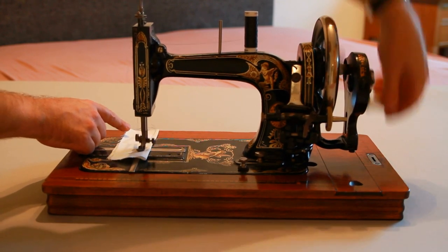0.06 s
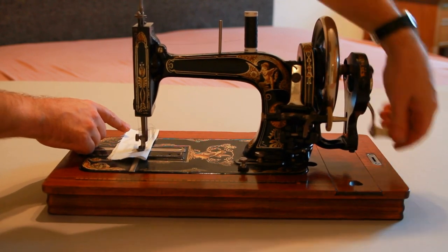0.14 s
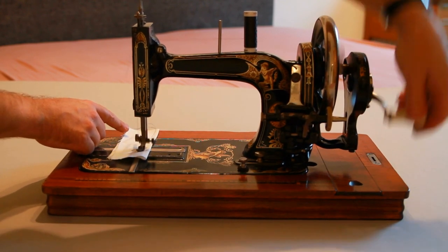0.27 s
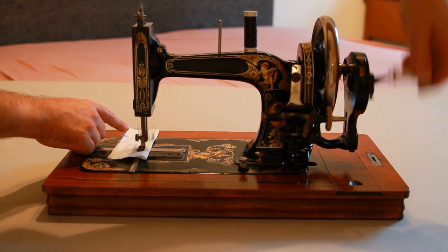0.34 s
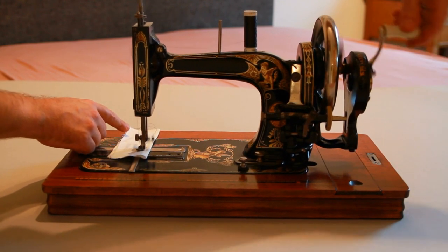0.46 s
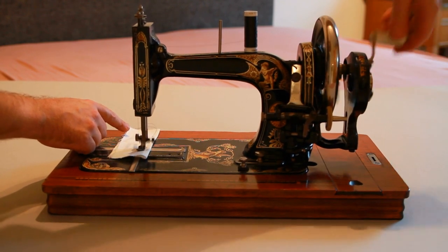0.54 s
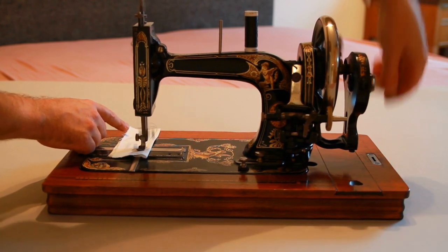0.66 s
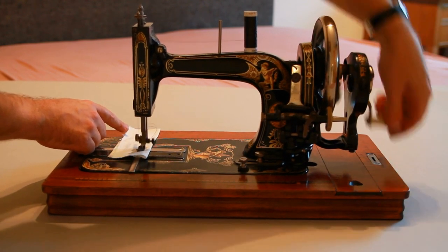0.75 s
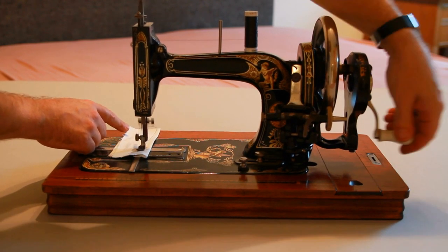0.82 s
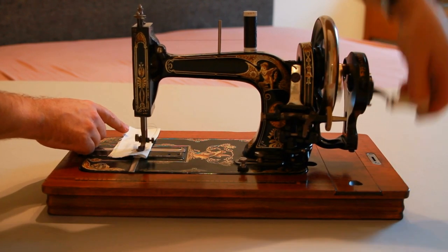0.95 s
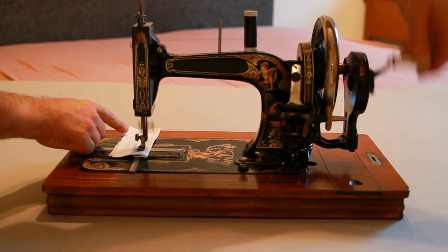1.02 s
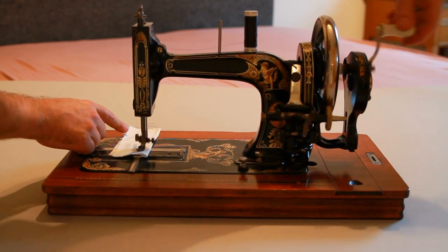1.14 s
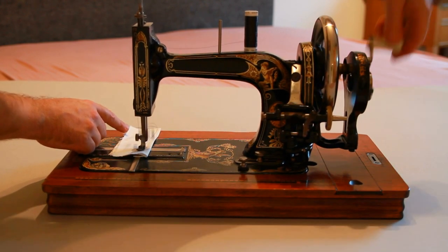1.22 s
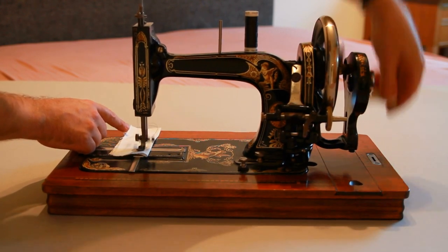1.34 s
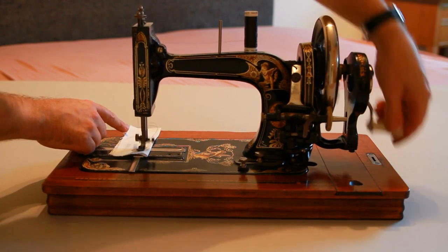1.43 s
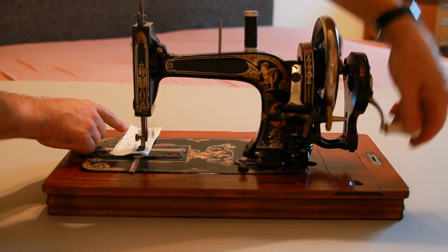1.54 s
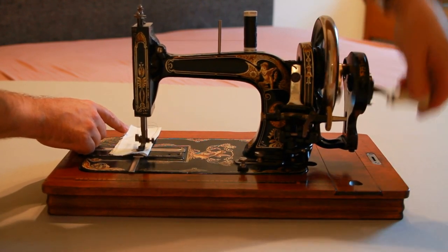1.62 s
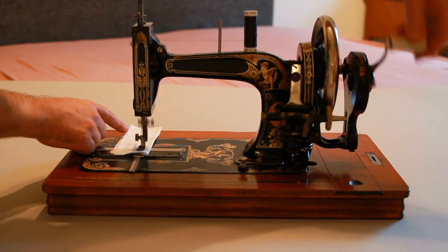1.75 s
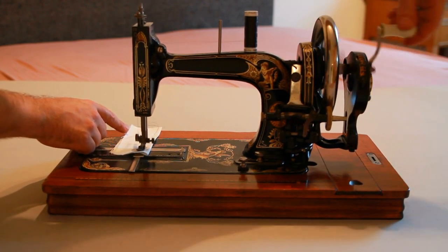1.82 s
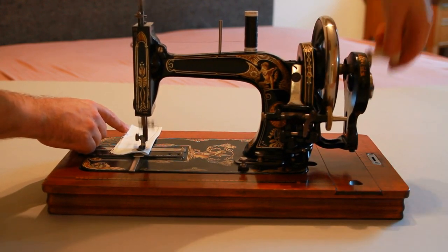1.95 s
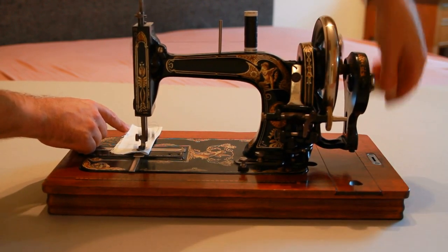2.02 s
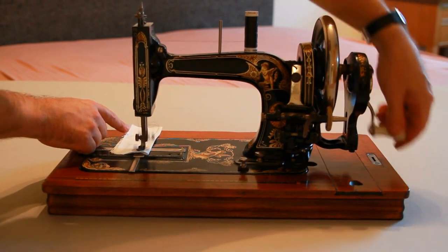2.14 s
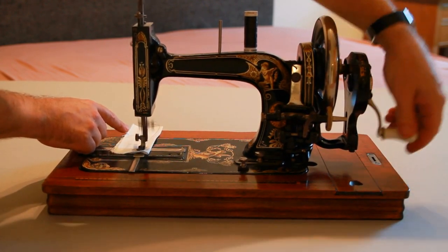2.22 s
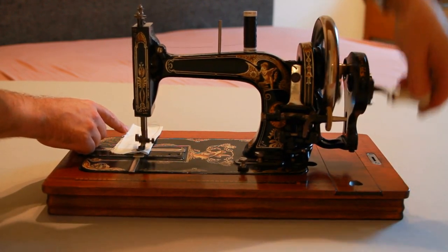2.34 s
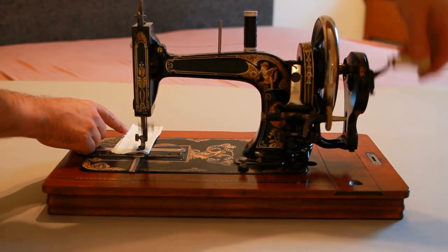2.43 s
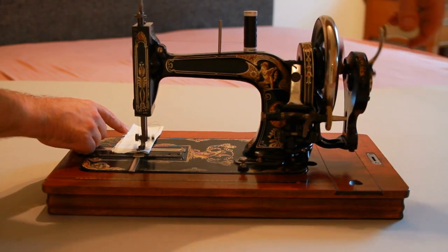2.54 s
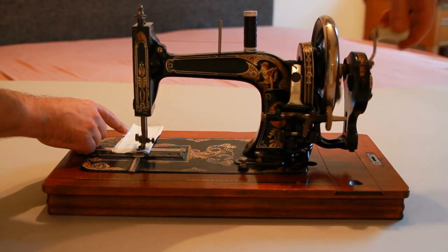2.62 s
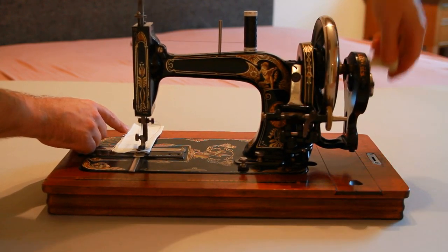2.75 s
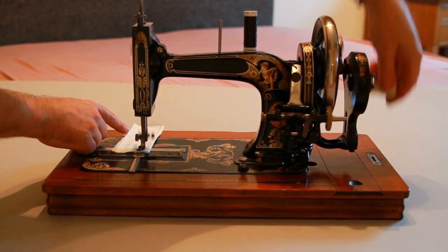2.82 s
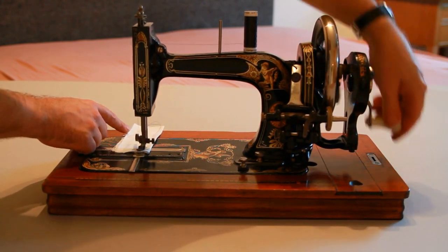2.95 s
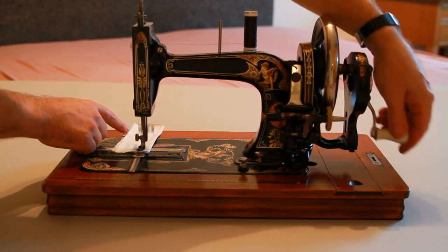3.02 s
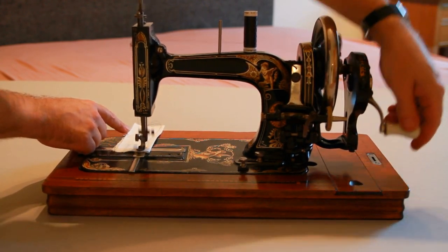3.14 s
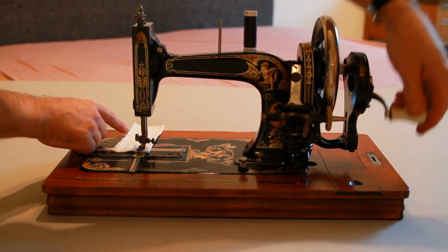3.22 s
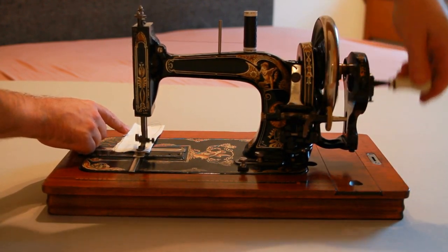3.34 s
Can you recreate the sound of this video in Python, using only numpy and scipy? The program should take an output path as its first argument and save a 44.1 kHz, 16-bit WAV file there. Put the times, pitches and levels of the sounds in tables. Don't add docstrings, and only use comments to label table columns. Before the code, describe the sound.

An old sewing machine's sharp metallic clacking, about four or five stitches a second, gradually slowing.

```python
import sys
import numpy as np
from scipy import signal
from scipy.fft import rfft, irfft
from scipy.io import wavfile
from scipy.ndimage import uniform_filter1d

SR = 44100
rng = np.random.default_rng(int(sys.argv[2]) if len(sys.argv) > 2 else 0)


def int16_out(signal):
    q = np.round(np.clip(np.atleast_2d(signal).T, -1, 1) * 32767)
    wavfile.write(sys.argv[1], SR, q.astype(np.int16))


def boost(x):
    u = np.asarray(x, float) / 20
    return 10 ** u


N = 147735

# start in seconds, peak in dB.
FEED_LIFTS = [(0.0595, -34), (0.2649, -29), (0.477, -35), (0.6958, -33), (0.9125, -32.5), (1.1334, -39),
              (1.3555, -35), (1.585, -35), (1.822, -29.5), (2.0592, -44), (2.2978, -38.5), (2.5745, -44),
              (2.8833, -45), (3.235, -41)]
# start in seconds, peak in dB.
FEED_PUSHES = [(0.0867, -21.5), (0.2907, -21.5), (0.5077, -22.5), (0.7212, -25), (0.94, -20), (1.1591, -26),
               (1.3833, -24.5), (1.612, -19), (1.8511, -21.5), (2.0822, -25), (2.3216, -21),
               (2.5945, -26.5), (2.8977, -28), (3.2514, -34)]
# start in seconds, peak in dB.
SHUTTLE_CLACKS = [(0.1141, -6), (0.3185, -3), (0.5347, -5.5), (0.7523, -4), (0.9683, -7), (1.1888, -16),
                  (1.4134, -1), (1.644, -15), (1.8797, -2.5), (2.1132, -7.5), (2.3583, -8), (2.636, -23),
                  (2.9457, -20.5), (3.3113, -27)]
# start in seconds, peak in dB.
SHUTTLE_RATTLES = [(.1400, -13.5), (.3445, -16.5), (.5632, -13), (.7790, -12), (.9971, -10), (1.2175, -16),
                   (1.4571, -18.5), (1.6725, -11), (1.9111, -14), (2.144, -13.5), (2.391, -11.5),
                   (2.6718, -11.5), (2.9908, -23), (3.3444, -26.5)]
# start in seconds, peak in dB.
TAKEUP_SLAPS = [(0.1523, 1), (0.3567, 0.5), (0.5755, 0.5), (0.791, -0.5), (1.0091, 0), (1.2302, 0.5),
                (1.6839, 1.5), (1.9232, 0), (2.1564, 1), (2.4041, 1), (2.6855, -2.5), (3.0028, -7)]
# start in seconds, peak in dB.
SPRING_TICKS = [(.2838, -29), (.4998, -32), (.7153, -35), (.9318, -34), (1.154, -40), (1.384, -29),
                (1.611, -27.5), (1.8432, -29), (2.0736, -40), (2.3151, -37), (2.593, -31), (2.8827, -47),
                (2.8963, -34), (3.2331, -45), (3.252, -42)]
# start in seconds, peak in dB.
STRAY_CLICKS = [(.13, -9), (.3127, -18), (.3787, -25), (.5546, -19), (.773, -22), (.9908, -15),
                (1.238, -13), (1.2548, -10.5), (1.6556, -14), (1.8992, -10), (1.9031, -7.5), (1.916, -9),
                (1.9354, -6.5), (1.9477, -12.5), (2.3674, -18), (2.382, -4.5), (2.4357, -21), (2.7995, -41),
                (2.9383, -28), (2.9594, -20), (2.9776, -23), (2.986, -16), (3.0086, -5.5), (3.0185, -18),
                (3.029, -6), (3.037, -8), (3.261, -32), (3.299, -37), (3.33, -29)]
# start in seconds, peak in dB.
CRANK_TICKS = [
    (2.786, -33),
    (2.848, -47),
    (2.8823, -33),
    (3.118, -37),
    (3.2345, -31),
]

# frequency in Hz, density in dB per Hz.
FEED_SPECTRUM = [(530, -11), (1300, 4), (2660, -19.5), (5190, 7.5), (7040, -13), (9900, -25),
                 (11600, -17.5), (15200, -31), (16500, -33)]
CLACK_SPECTRUM = [(530, -34), (900, -27.5), (2410, -24), (3270, -15.5), (3920, -6.5), (5650, -5.5),
                  (8980, -2.5), (15200, -3), (16500, -10.5)]
RATTLE_SPECTRUM = [(530, -20), (900, -8), (3780, 0.5), (6080, -5.5), (7040, 6), (7660, -6), (13100, 1.5),
                   (15500, -7), (16500, -3)]
SLAP_SPECTRUM = [(600, -30), (1500, -13.5), (3000, -8), (6300, -5), (8300, -7), (10400, -1.5), (13600, 0.5),
                 (16500, -3.5)]
SPRING_SPECTRUM = [(1500, 2.5), (4000, 1), (9000, -7), (15000, 2)]
CRANK_SPECTRUM = [(700, -5), (3600, 4), (15000, -17)]
# frequency in Hz, level in dB over the contact's spectrum, T60 in seconds.
FEED_RESONANCES = [(4850, 2, .03), (5120, 5, .045), (5750, 5, .02), (6100, 2, .02), (2040, 8, .06),
                   (1400, 1, .03)]
CLACK_RESONANCES = [(3850, 3, .03), (4200, 4, .03), (4480, 3, .03), (9100, 2, .03), (6950, 1, .03)]
SLAP_RESONANCES = [(10050, 6, .04), (10290, 9, .04), (7030, 4, .03), (4840, 4, .04), (13250, 3, .03),
                   (13730, 5, .04), (8000, 2, .05)]
SPRING_RESONANCES = [(10150, 13, .04), (10450, 11, .03)]

# start in seconds, peak in dB, frequency in Hz.
LOW_BASE_KNOCKS = [(0.032, -29.5, 328), (0.099, -22, 317.7), (0.16, -21, 313.4), (0.299, -22.5, 343),
                   (0.362, -36, 242), (0.4, -27, 307), (0.52, -21, 326), (0.569, -24.5, 282),
                   (0.8, -21, 325.5), (0.863, -26, 350.5), (0.948, -22, 337), (1.232, -31, 214),
                   (1.316, -26, 324), (1.727, -25.5, 347), (1.824, -29, 307.5), (1.912, -25.5, 330.4),
                   (2.074, -20, 318), (2.149, -25, 281), (2.208, -26, 326), (2.279, -35, 325),
                   (2.323, -19.5, 294), (2.393, -24, 332.4), (2.628, -36, 307), (2.748, -25, 306),
                   (3.011, -27, 302), (3.235, -25, 301)]
MID_BASE_KNOCKS = [(0.091, -24, 419), (0.134, -24, 580), (0.181, -28, 463), (0.295, -27.5, 710),
                   (0.338, -37, 468), (0.375, -43, 436), (0.51, -27, 429), (0.591, -34, 609),
                   (0.75, -26, 537), (0.82, -27.5, 520), (0.93, -30, 583), (0.967, -35, 625),
                   (1.003, -33, 454), (1.216, -28, 445), (1.375, -30.5, 444), (1.411, -26, 593),
                   (1.613, -31, 440), (1.669, -30, 465), (1.704, -23.5, 442), (1.824, -29.5, 783),
                   (2.139, -20, 582), (2.323, -30, 720), (2.438, -25, 442), (2.769, -36, 397),
                   (2.883, -28.5, 573), (2.978, -30, 392)]
# start in seconds, peak in dB, frequency in Hz.
FEED_BAR_CHIRPS = [(0.0528, -35, 1930), (0.1416, -34, 2040), (0.2713, -33, 2025), (0.6868, -39, 2050),
                   (0.7816, -37, 1980), (0.8889, -39, 2100), (1.1403, -38, 2120), (1.4057, -45, 2090),
                   (1.5883, -35, 2080), (1.6766, -32, 2030), (1.8053, -42, 1940), (2.0438, -52, 2150),
                   (2.144, -39, 2060), (2.385, -37, 2020), (2.6728, -32, 2240), (3.0031, -38, 2110)]
# frequency in Hz, level in dB, T60 in seconds.
BASE_RESONANCES = [(121, -9, 0.14), (175, -12, 0.11), (213.4, -6, 0.23), (261.7, -0.5, 0.098),
                   (281, -5.5, 0.15), (324.9, -2.5, 0.22), (382, -9, 0.044), (450.7, -7.5, 0.2),
                   (520, -11, 0.086), (585.7, -3.5, 0.087), (718, -4, 0.058), (784, -9, 0.2),
                   (1430, 3.5, 0.012), (1970, -16, 0.11)]
# time in seconds, level in dB.
CRANK_FORCE = [(0.0, -29.5), (0.14, -30.5), (0.2, -32), (1.01, -32), (1.09, -35.5), (1.25, -33.5),
               (2.02, -33.5), (2.15, -33), (2.3, -34), (2.33, -34.5), (2.52, -36.5), (2.74, -36),
               (2.86, -40), (2.89, -37.5), (3.06, -34), (3.22, -42), (3.25, -36), (3.35, -42)]
# frequency in Hz, density in dB per Hz.
WHIRR_SPECTRUM = [(24, -42), (40, -34.5), (308, -2), (523, -13.5), (2900, -23), (5050, -28), (13500, -38),
                  (15300, -37), (16500, -34)]
# frequency in Hz, density in dB per Hz.
GEAR_TICK_SPECTRUM = [(300, -8), (700, 0), (2000, -3), (5000, -13), (15000, -24)]


def train(s, gains):
    out = np.full(N, 1e-18)
    np.add.at(out, np.clip((np.asarray(s) * SR).astype(int), 0, N - 1), gains)
    return out


def ring(x, hz, t60):
    radius, angle = boost(-60 / (t60 * SR)), 2 * np.pi * hz / SR
    return signal.lfilter([0, np.sin(angle)], [1, -2 * radius * np.cos(angle), radius * radius], x)


def colour(x, points):
    hz, db = np.transpose(points)
    grid_hz = np.linspace(1, SR / 2, 2049)
    log_gain = np.log(boost(np.interp(np.log(grid_hz), np.log(hz), db)))
    cepstrum = irfft(log_gain)
    cepstrum[1:2048] *= 2
    cepstrum[2049:] = 0
    pulse = irfft(np.exp(rfft(cepstrum)))
    return signal.fftconvolve(x, pulse / np.linalg.norm(pulse))[:N]


def strength(mean_db):
    return mean_db * np.minimum(rng.exponential(1, N), 3)


def burst_envelope(seconds, rise_s, t60):
    t = np.arange(int(seconds * SR)) / SR
    return (1 - np.exp(-t / rise_s)) * boost(-60 * t / t60)


def room_wash(hits):
    decay = boost(-18) * burst_envelope(0.5, rise_s=0.0026, t60=0.23)
    energy = signal.fftconvolve(hits ** 2, decay ** 2)[:N]
    wash = np.sqrt(np.abs(energy)) * rng.standard_normal(N)
    return signal.sosfilt(signal.butter(1, 7760, fs=SR, output="sos"), wash)


def contact(rows, tone, gain_db, crack_db, rise_s, t60, bounces, modes=()):
    s, db = np.transpose(rows)
    hits = train(s, boost(db + gain_db))
    for after_s, loss_db in bounces:
        bounce_s = s + after_s * rng.uniform(1.0, 1.19, len(s))
        bounce_db = db + gain_db + loss_db + rng.normal(0, 3.1, len(s))
        hits = hits + train(bounce_s, boost(bounce_db))
    impacts = rng.choice([-1.645, 0.032, 0.021, 0.076, 1.58], N) * boost(strength(3.74) - 5)
    burst = signal.fftconvolve(hits, burst_envelope(0.5, rise_s, t60))[:N] * impacts
    crack = signal.lfilter([1, -0.88], [1], train(s + rise_s, boost(db + crack_db)))
    out = colour(burst + crack + room_wash(hits), tone)
    ringing = 0
    for hz, boost_db, mode_t60 in modes:
        unit_peak = 2 * (1 - boost(-60 / (mode_t60 * SR)))
        ringing = ringing + unit_peak * boost(boost_db) * ring(out, hz, mode_t60)
    return out + ringing


def iron_contacts():
    # (delay s, level dB)
    metal = (contact(TAKEUP_SLAPS, SLAP_SPECTRUM, -2, 1.5, 0.0004, 0.009, [(0.003, -9)], SLAP_RESONANCES)
             + contact(SHUTTLE_CLACKS, CLACK_SPECTRUM, -2.03, -0.39, 0.0003, 0.0086,
                       [(0.0013, -9), (0.0055, -17)], CLACK_RESONANCES)
             + contact(SHUTTLE_RATTLES, RATTLE_SPECTRUM, -5.0, -5, 0.00025, 0.026, [(0.002, -14)])
             + contact(FEED_PUSHES, FEED_SPECTRUM, 0.78, 2.3, 0.00025, 0.011, [(0.004, -13.5)], FEED_RESONANCES)
             + contact(FEED_LIFTS, FEED_SPECTRUM, 8, 2, 0.00033, 0.0058, [(0.006, -33)], FEED_RESONANCES)
             + contact(SPRING_TICKS, SPRING_SPECTRUM, -1.5, -16, 0.00081, 0.018, [(0.008, 3.5)],
                       SPRING_RESONANCES)
             + contact(STRAY_CLICKS, CLACK_SPECTRUM, -1.5, -7, 0.00029, 0.0075, [(0.003, -13)])
             + contact(CRANK_TICKS, CRANK_SPECTRUM, 0.0, -3, 0.0004, 0.015, []))
    echo_s, echo_db = 0.013, -15
    echo = np.r_[np.zeros(int(echo_s * SR)), metal][:N]
    return metal + boost(echo_db) * echo


def knocks(rows, gain_db, rise_s, t60):
    out, t = np.zeros(N + SR), np.arange(SR // 4) / SR
    shape = burst_envelope(0.25, rise_s, t60)
    for s, db, hz in rows:
        start, bend = rng.uniform(-0.99, 1, 2)
        phase = 2 * np.pi * hz * t * (1 + 0.39 * bend * t) + np.pi * start
        i = int(s * SR)
        out[i:i + len(t)] += boost(db + gain_db) * shape * np.sin(phase)
    return out[:N]


def backlash():
    return (knocks(LOW_BASE_KNOCKS, 0.4, 0.012, 0.18) + knocks(MID_BASE_KNOCKS, 0.37, 0.0071, 0.1)
            + knocks(FEED_BAR_CHIRPS, 0.5, 0.0045, 0.11))


def crank_load_db():
    swell_db, swell_at = 2.5, 0.33
    t, lifts = np.arange(N) / SR, np.transpose(FEED_LIFTS)[0]
    before, after = 2 * lifts[0] - lifts[1], 2 * lifts[-1] - lifts[-2]
    lifts = np.r_[before, lifts, after]
    turn = np.interp(t, lifts, np.arange(len(lifts)))
    force = np.interp(t, *np.transpose(CRANK_FORCE))
    return force + swell_db * np.cos(2 * np.pi * (turn - swell_at))


def base_response(force):
    out = 0
    for k, (hz, db, t60) in enumerate(BASE_RESONANCES):
        out = out + boost(db) * (-1) ** k * ring(force, hz, t60)
    return out


def base(load):
    teeth_per_s, rumble_db, push_db, slap_db = 500, -4, -21.5, -34
    meets = rng.random(N) < teeth_per_s / SR
    teeth = meets * boost(strength(2.9)) * rng.choice([-1, 1], N)
    rumble = base_response(boost(load) * teeth)
    rumble = rumble / np.sqrt(np.mean(rumble ** 2) + 1e-20)
    push_s, push_peak = np.transpose(FEED_PUSHES)
    slap_s, slap_peak = np.transpose(TAKEUP_SLAPS)
    thuds = train(push_s, boost(push_peak + push_db)) + train(slap_s, boost(slap_peak + slap_db))
    return boost(rumble_db + load.mean()) * rumble + base_response(thuds)


def whirr(load):
    level_db, follows = -3.5, 0.83
    level = level_db + load.mean() + follows * (load - load.mean())
    return boost(level) * colour(rng.standard_normal(N), WHIRR_SPECTRUM)


def gear_ticks(load):
    ticks_per_s, level_db = 60, -43.5
    born = (rng.random(N) < ticks_per_s / SR) * boost(strength(1.6) + load - load.mean())
    envelope = signal.lfilter([1], [1, -0.985], born)
    return boost(level_db) * colour(envelope * rng.standard_normal(N), GEAR_TICK_SPECTRUM)


def last_slap_tail():
    level_db, t60 = -38, 0.17
    decay = boost(level_db - 60 * np.arange(N) / SR / t60)
    return decay * colour(rng.standard_normal(N), SLAP_SPECTRUM)


def scene():
    load = crank_load_db()
    mix = iron_contacts() + backlash() + base(load) + whirr(load) + gear_ticks(load) + last_slap_tail()
    return mix[None, :]


def low_pass(x, hz):
    return signal.sosfilt(signal.cheby2(12, 60, hz, fs=SR, output="sos"), x)


def roll_off(x):
    return signal.sosfilt(signal.butter(12, 16970, fs=SR, output="sos"), x)


def record(dry):
    steady_cut_hz, top_db, gate_db = 16000, -15, -62
    dry = 1.267 * np.tanh(dry / 1.333)
    dry = signal.sosfilt(signal.butter(2, 59, "high", fs=SR, output="sos"), dry)
    body = low_pass(dry, steady_cut_hz * 1.02)
    top = signal.sosfilt(signal.butter(8, steady_cut_hz, "high", fs=SR, output="sos"), dry)
    power = uniform_filter1d(top ** 2, size=300)
    top = top * power / (power + boost(2 * gate_db))
    mix = low_pass(body + boost(top_db) * top, 17350)
    return roll_off(mix)


dry = scene()
out = record(dry)
int16_out(out)
```